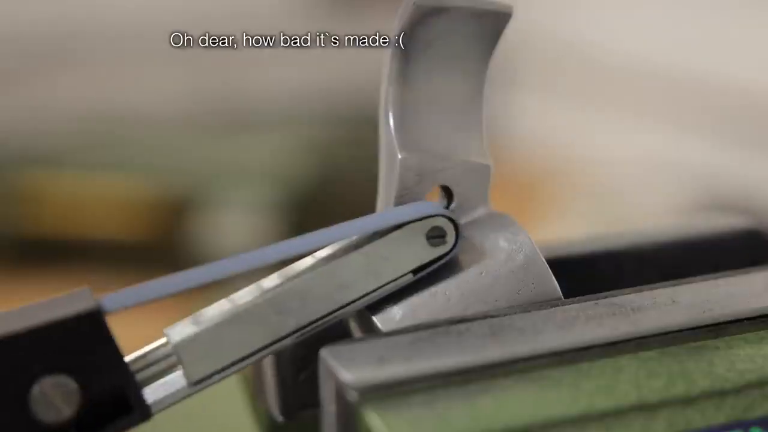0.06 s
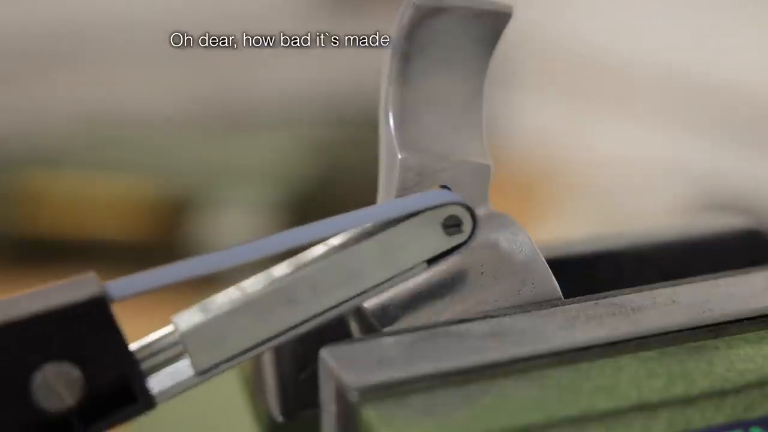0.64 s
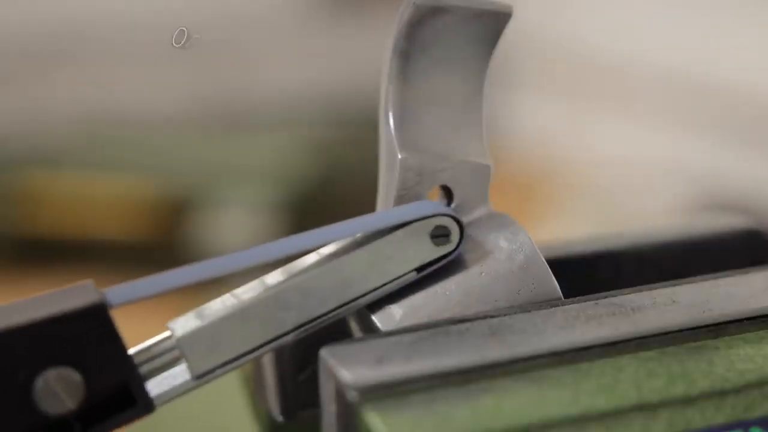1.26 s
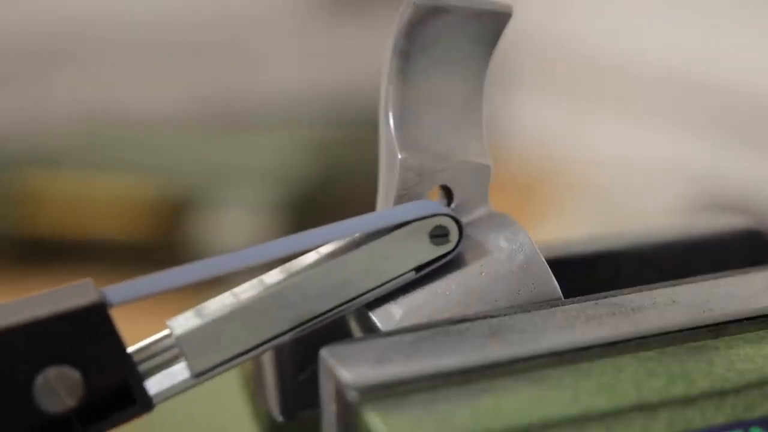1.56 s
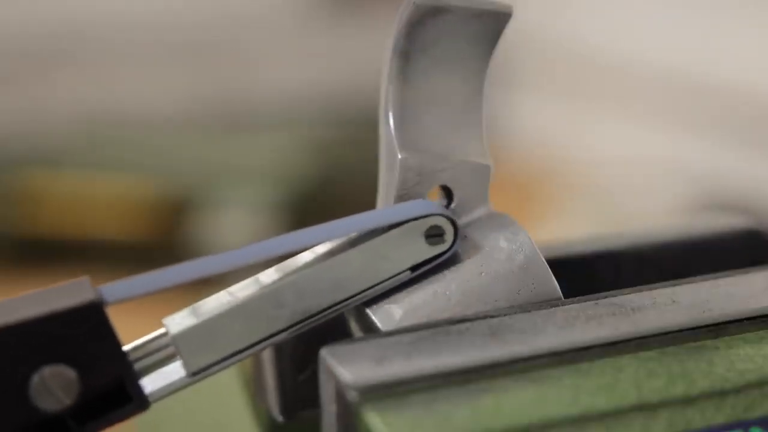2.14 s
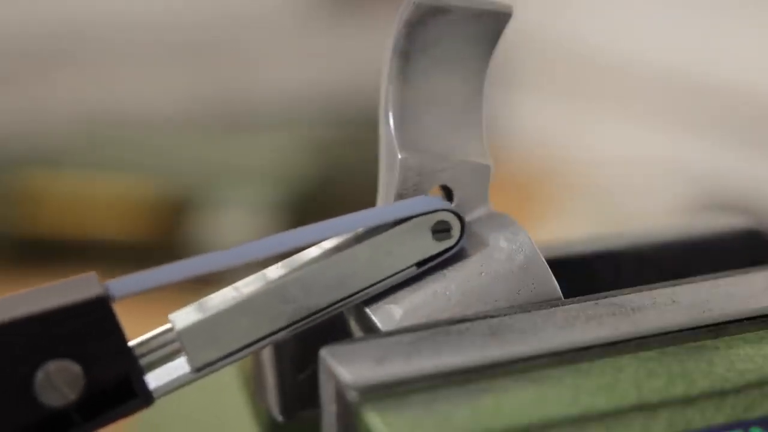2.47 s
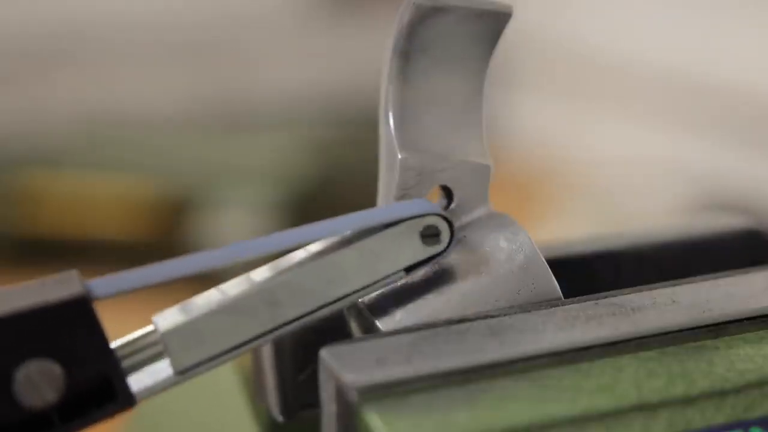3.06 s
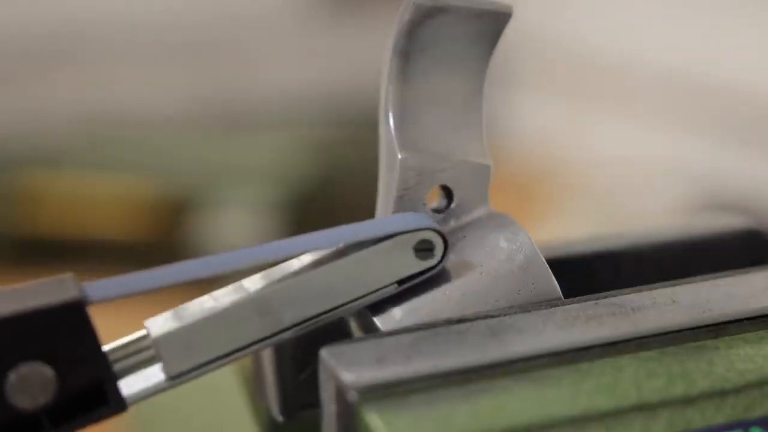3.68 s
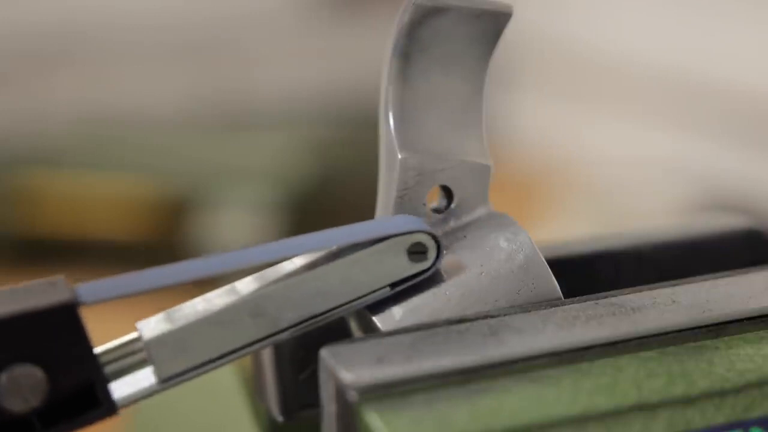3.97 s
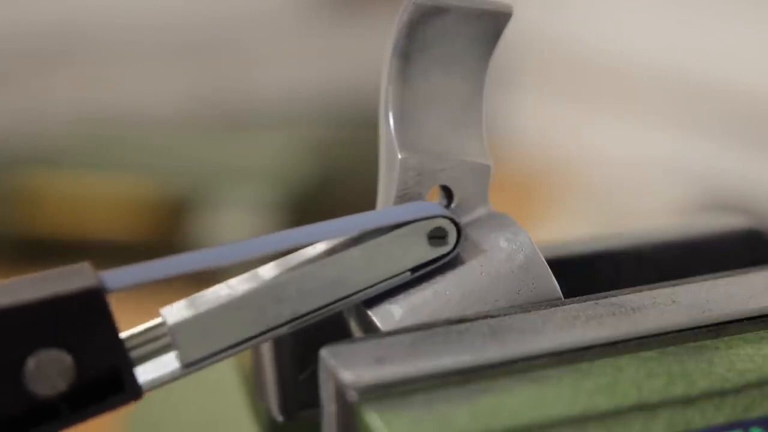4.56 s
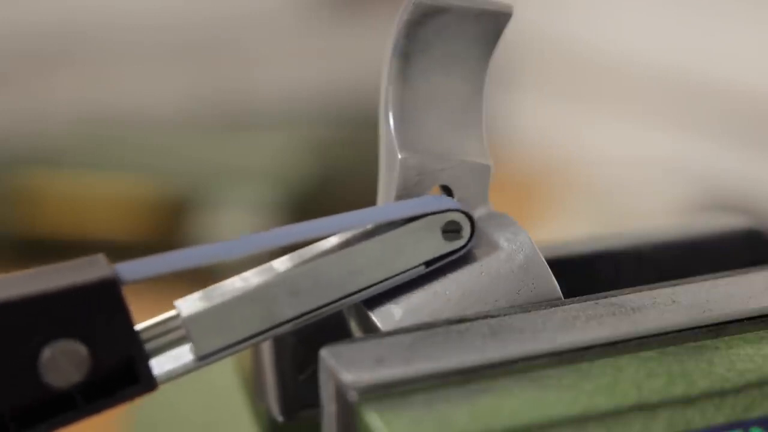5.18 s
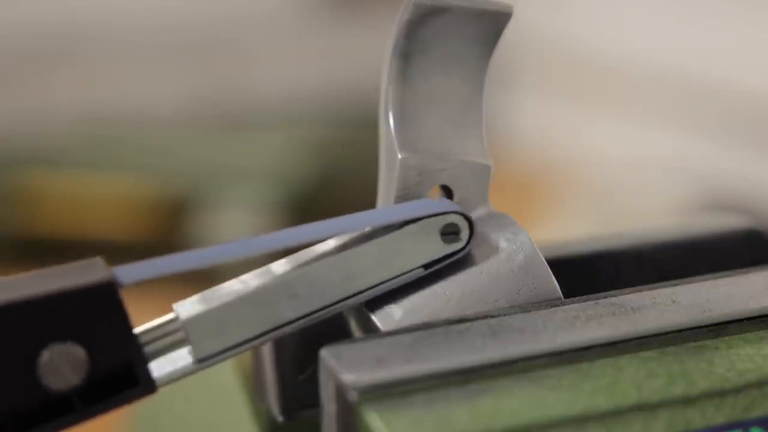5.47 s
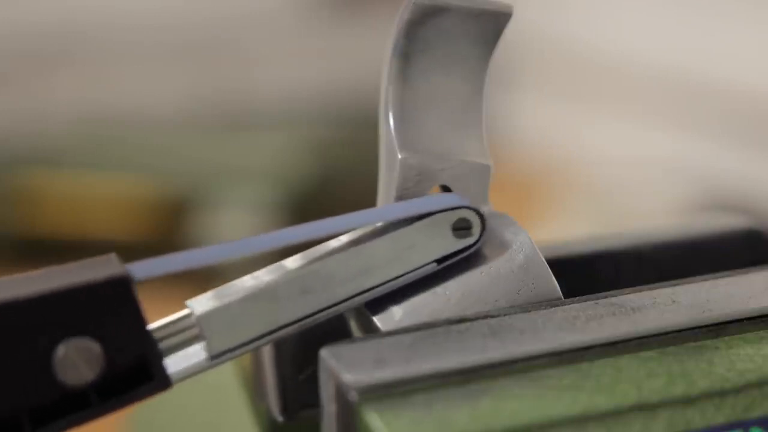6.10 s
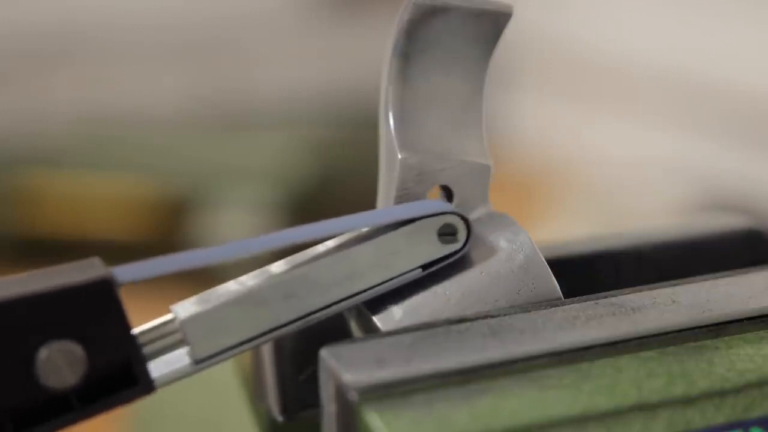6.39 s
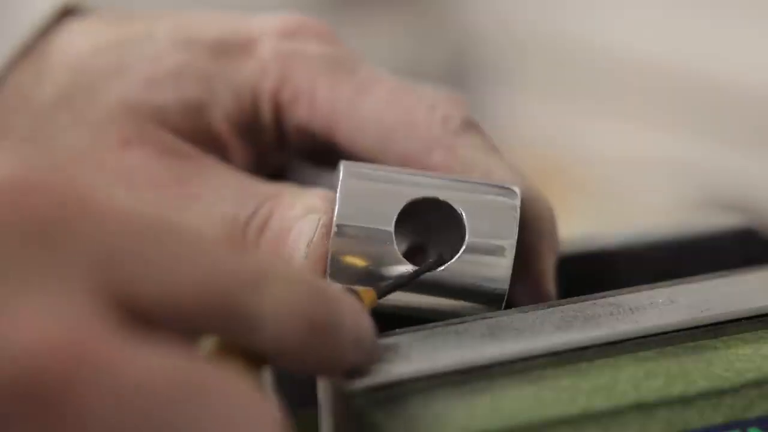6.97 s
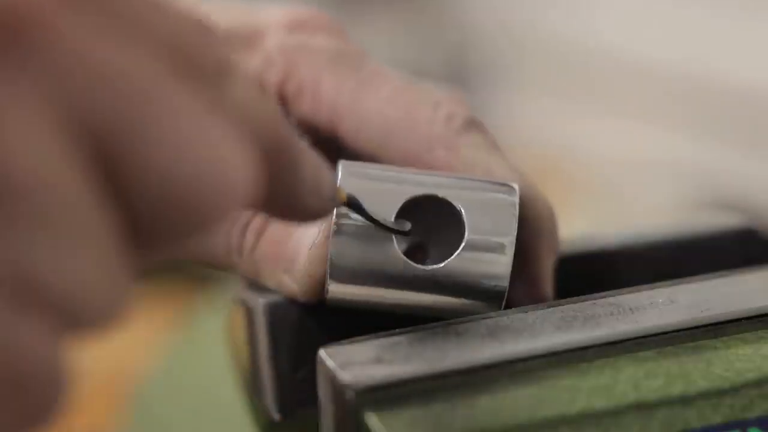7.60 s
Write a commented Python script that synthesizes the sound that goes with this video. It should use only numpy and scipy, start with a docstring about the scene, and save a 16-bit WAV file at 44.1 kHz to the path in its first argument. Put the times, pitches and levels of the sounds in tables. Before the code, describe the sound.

Close by, a whining, rattling belt sander rasps on a metal part, then cuts off, leaving quiet handling and small scratches.

```python
"""In a small workshop, close by, an electric belt file grinds a cast metal part held in a vice.
Its motor pulls in jerks, one each half-wave of the mains power, so the gear whine and the rattle buzz.
The gritty belt hisses and tears off chips; pressing harder slows it, and at times the tool's arm squeals.
The grinding stops dead. Then, quietly, hands hold the part and a hooked scraper picks at the edge
of its bore (the round hole in it)."""
import sys
import numpy as np
from scipy import signal
from scipy.fft import rfft, irfft
from scipy.io import wavfile

SR = 44100
rng = np.random.default_rng(int(sys.argv[2]) if len(sys.argv) > 2 else 0)


def to_wav(sig):
    """Store sig (one row per channel, or 1-D mono) as 16-bit WAV at the path in sys.argv[1].

    Samples outside -1..1 are clipped; the rate is SR.
    """
    pcm = np.clip(np.atleast_2d(sig), -1, 1) * 32767
    pcm = np.round(pcm).astype(np.int16)
    wavfile.write(sys.argv[1], SR, pcm.T)  # frames by channels


N = 345461
T = np.arange(N) / SR

# The gear's speed, highest when the belt runs free. Each row: time in seconds, teeth per second.
GEAR_SPEED = [(0.0, 1646), (0.24, 1619), (0.4, 1655), (0.55, 1638), (0.66, 1686), (1.15, 1679),
              (1.72, 1624), (1.9, 1634), (2.13, 1603), (2.57, 1594), (2.73, 1687), (3.55, 1683),
              (3.75, 1630), (4.2, 1649), (4.79, 1622), (5.06, 1650), (5.21, 1606), (5.38, 1632),
              (5.49, 1605), (5.65, 1632), (5.8, 1593), (5.96, 1622), (6.14, 1573), (6.33, 1620),
              (6.7, 1618)]
# The belt is laid on the part. Each row: touch and lift times in seconds, then levels in dB of
# the hiss at full load, the fizz of chips and the squeal at its strongest.
PASSES = [(0.0, 0.512, -42.5, -50.5, -41.5), (1.064, 2.56, -41.5, -45.5, -36.5),
          (3.331, 4.5, -47, -49.5, -45.5), (4.654, 5.42, -42.5, -48.5, -35), (5.496, 6.72, -45, -46, -40.5)]
# The grit bites deeper. Each row: start in seconds, length in seconds, fizz level in dB.
BITES = [(0.29, 0.075, -43), (1.06, .06, -44), (1.41, .07, -43.5), (1.72, 0.099, -40.5), (1.99, 0.11, -40),
         (2.33, 0.11, -45), (4.67, .08, -44.5), (4.96, .05, -40.5), (5.11, .05, -44.5), (5.29, 0.13, -42.5),
         (5.56, 0.15, -48), (5.95, .1, -44)]
# The belt snags on an edge with a dull scrape. Each row: start in seconds, length in seconds, level in dB.
SNAGS = [(3.59, .05, -58), (5.08, .14, -57), (6.09, 0.024, -50.5)]
# The belt rollers' tones. Each row: pitch in Hz at 1690 teeth per second, relative level in dB.
ROLLER_TONES = [(50, -12), (75, -9), (95, 0), (188, -15), (247, -9), (263, -6)]
# The handwork. Each row: time in seconds, relative levels in dB of hand rumble and of scraper rubbing.
HANDWORK = [(6.74, -91, -99), (6.876, -69, -85), (7.146, -73.5, -99), (7.212, -81, -98),
            (7.346, -78.5, -99), (7.722, -62, -82), (7.83, -71, -74)]
# The scraper catches. Each row: time in seconds, relative level in dB, offset for its knock in dB.
CATCHES = [(7.492, -67, -2), (7.553, -66, -3), (7.583, -68, -2), (7.624, -56, -15), (7.632, -59, -10),
           (7.666, -58, -2), (7.707, -59, -10), (7.754, -62, -8), (7.79, -47.5, -23), (7.804, -61, -4),
           (7.814, -57, 2)]
# The scraper rings on the part. Each row: pitch in Hz, relative level in dB, seconds to fade by 60 dB.
SCRAPER_TONES = [(650, -3, .006), (1590, -5, 0.0096), (2620, -11, .013), (2770, -9, .013),
                 (3190, -2, 0.013), (3330, -8, 0.013), (3500, -18.5, 0.014), (5000, -22, .008),
                 (6350, -18, .01), (8430, -13, .007)]

# How low or bright each noise is. Each row: frequency in Hz, relative level in dB.
CHATTER_COLOUR = [(200, -30), (480, -21.5), (630, -7.5), (1100, -7.5), (1350, -3.5), (1950, -2.5),
                  (2800, 0), (3900, 3.5), (4350, -4.5), (6300, -5.5), (9000, -18.5), (14000, -35)]
REBOUND_COLOUR = [(2000, -25.5), (3000, -0.5), (3750, 3.0), (4600, -27.5), (8000, -27.5)]
SPARK_COLOUR = [(6000, -22), (9800, 0), (11500, 0), (13000, -13), (16000, -23)]
HISS_COLOUR = [(2000, -21.5), (5000, -15.5), (7000, 1), (9000, -2), (11300, -9), (12500, -16),
               (16000, -28.5)]
FIZZ_COLOUR = [(3000, -18), (7000, 1.5), (10500, 5.5), (12500, -1.5), (14000, 0), (16000, -8.5)]
RUB_COLOUR = [(30, -13), (130, 0), (240, 2), (450, 5.5), (800, -3), (1200, 7), (2200, -17)]
HANDS_COLOUR = [(20, -22), (40, -2), (90, 1.5), (140, -27), (300, -24), (600, -25), (1500, -55)]
ROOM_COLOUR = [(59, -33), (100, -2), (467, -13), (576, -14.5), (774, -20), (1090, -19.5), (1310, -22.5),
               (13900, -29.5), (15500, -33)]

# Where the tool's housing, its metal arm, the part and the bench like to ring.
# Each row: frequency in Hz, width in Hz, boost in dB.
HOUSING_RINGS = [(1574, 220, 5), (3764, 220, 5), (5170, 260, 9.5), (5557, 310, 5)]
ARM_RINGS = [(1259, 24, 6), (1496, 20, 6), (2994, 20, 7), (3201, 30, 6), (3436, 20, 6), (3665, 30, 4),
             (3737, 28, 3), (5597, 30, 5), (6200, 40, 4)]
PART_RINGS = [(7720, 110, 6), (9033, 45, 7), (9217, 45, 8), (13900, 250, 4)]
BENCH_RINGS = [(48.1, 14, 4.5), (214, 48, 20.5)]

STOP_S, JERK_HZ, GEAR_TEETH = 6.713, 95.955, 11
FREE_HZ, SAG_HZ = 1686, 85  # load is 0 at the free tooth rate and 1 (full) when SAG_HZ slower
WHINE_DB, WHINE_TOUCH_DB, WHINE_SQUEAL_DB = -39.7, -2.5, 2.8  # level; change on the part; change in a squeal
THIRD_DB, THIRD_TOUCH_DB = -48, -2  # overtone at three times the whine's pitch; change on the part
SQUEAL_HZ, SQUEAL_WIDTH_HZ, SQUEAL_BUILD_S = 3192, 55, .11
# Each pair: a base level, and how much that sound grows from no load to full load.
RATTLE_DB, RATTLE_LOAD_DB = -33.5, 0.93
HISS_DB, HISS_LOAD_DB = -43, 5
RUB_DB, RUB_LOAD_DB = -66.5, 2.5
THRUM_DB, THRUM_LOAD_DB = -71, 8.5


def amp(db):
    """Turns decibels into a number to multiply by."""
    return 10 ** (np.asarray(db) / 20)


def unit(x):
    """Scales a signal to an average strength (rms) of 1."""
    return x / np.sqrt(np.mean(x ** 2) + 1e-20)


def curve(rows, column=1):
    """Joins one column of a table with straight lines in time."""
    rows = np.array(rows)
    return np.interp(T, rows[:, 0], rows[:, column])


def wander(hz):
    """A smooth random drift, mostly slower than hz."""
    freqs = np.fft.rfftfreq(8192, T[-1] / 8192)
    slow = irfft(rfft(rng.standard_normal(8192)) / (1 + (freqs / hz) ** 4))
    return unit(np.interp(T, np.linspace(0, T[-1], len(slow)), slow))


def colour(x, points, rings=()):
    """Shapes a sound with a colour table and any ringing boosts; the result has strength 1."""
    freqs = abs(np.fft.fftfreq(8192, 1 / SR))
    hz, db = np.transpose(points)
    boost_db = sum(boost / (1 + (2 * (freqs - centre) / width) ** 2) for centre, width, boost in rings)
    gain = amp(np.interp(np.log(freqs + 1), np.log(hz), db) + boost_db)
    response = np.exp(np.conj(signal.hilbert(np.log(gain))))  # rings after a click, never before
    ring = np.fft.ifft(response).real[:4096]
    return unit(signal.oaconvolve(x, ring)[:N])


def grains(per_s, spread_db):
    """Random clicks; a wider spread makes a few much louder than the rest."""
    size = amp(spread_db * np.minimum(rng.exponential(1, N), 4))
    return unit(size * rng.choice([-1, 1], N) * (rng.random(N) < per_s / SR))


def held(start, end, rise=.02, fall=.14):
    """Fades in from start, holds at 1 until end, then fades out; all in seconds."""
    end = max(end, start + rise)
    return np.interp(T, [start, start + rise, end, end + fall], [0, 1, 1, 0])


def bursts(rows):
    """A short swell in loudness for each row."""
    return sum(amp(db) * held(start, start + length, rise=.025, fall=.05) for start, length, db in rows)


def jerk(centre, width):
    """A smooth bump at every motor jerk; centre and width are fractions of one cycle."""
    offset = (T * JERK_HZ - centre + .5) % 1 - .5
    return np.exp(-.5 * (offset / width) ** 2)


def kick(start, decay):
    """A quick rise and slower fall at every motor jerk; start and decay are fractions of one cycle."""
    age = (T * JERK_HZ - start) % 1 / decay
    return age * np.exp(1 - age)


def taps(centre, jitter, spread_db):
    """One click per motor jerk, never quite alike; centre and jitter are fractions of one cycle."""
    count = int(T[-1] * JERK_HZ) - 1
    late, size = rng.standard_normal((count, 2)).T
    at = np.round((np.arange(count) + centre + jitter * late) / JERK_HZ * SR).astype(int)
    return unit(np.bincount(np.clip(at, 0, N - 1), amp(spread_db * size), N))


def arm_ringing(speed):
    """How strongly the arm rings, 0 to 1: it builds while twice the whine's pitch is near the arm's own."""
    near = 1 / (1 + (2 * (2 * speed - SQUEAL_HZ) / SQUEAL_WIDTH_HZ) ** 2)
    memory = np.exp(-1 / (SQUEAL_BUILD_S * SR))
    built_up = signal.lfilter([1 - memory], [1, -memory], near)
    return np.sqrt(near * built_up)


def gear_whine(teeth, contact, ringing):
    """Each jerk presses the teeth harder and twists the gear ahead; the gear wobbles once a turn."""
    pull = 1 + 2.4 * jerk(centre=.53, width=.1) + .55 * jerk(centre=.98, width=.1)
    twist = .9 * jerk(centre=.85, width=.1)
    phase = 2 * np.pi * teeth
    shaft = phase / GEAR_TEETH
    force = pull * (1 - .25 * np.cos(shaft)) * amp((.5 + 1.5 * contact) * wander(hz=9))
    sway = twist + .22 * np.sin(shaft) + .1 * wander(hz=40)
    whine_db = WHINE_DB + WHINE_TOUCH_DB * contact + WHINE_SQUEAL_DB * ringing
    whine = amp(whine_db) * unit(force * np.cos(phase + sway))
    # The arm rings on between jerks, so its squeal, an octave up, is steadier.
    grip = sum(amp(db) * held(touch, lift) for touch, lift, _, _, db in PASSES)
    squeal = grip * ringing * unit(np.sqrt(force) * np.cos(2 * phase + .5 * sway))
    third = amp(THIRD_DB + THIRD_TOUCH_DB * contact) * unit(force * np.cos(3 * phase + sway))
    return whine + squeal + third


def drive_rattle(teeth, load):
    """Each jerk knocks the loose drive to and fro; chatter and fan air ring the housing in between."""
    wobble = 1 + .15 * np.cos(2 * np.pi * teeth / GEAR_TEETH)
    clicks = grains(per_s=18000, spread_db=3) * (1 + .31 * kick(start=.42, decay=.032)) * wobble
    knocks = taps(centre=.625, jitter=.014, spread_db=2.1)
    chatter = colour(clicks, CHATTER_COLOUR, HOUSING_RINGS + ARM_RINGS)
    rebound = colour(knocks, REBOUND_COLOUR, HOUSING_RINGS + ARM_RINGS)
    level_db = RATTLE_DB + RATTLE_LOAD_DB * load + .5 * wander(hz=22)
    return amp(level_db) * unit(chatter + amp(-6) * rebound)


def sparks():
    """The motor's brushes spit a short, bright crackle each time the current peaks."""
    spit = grains(per_s=20000, spread_db=2) * jerk(centre=.49, width=.04) * amp(2 * wander(hz=45))
    return amp(-50) * colour(spit, SPARK_COLOUR)


def belt(load):
    """The belt hisses along the arm; its grit tears off chips in uneven bites, over dull rubbing."""
    pull = amp(wander(hz=52)) * (1 + .5 * kick(start=.37, decay=.088))
    hiss = colour(grains(per_s=20000, spread_db=5.5) * pull, HISS_COLOUR, PART_RINGS)
    chips = grains(per_s=20000, spread_db=2) * pull * amp(.9 * wander(hz=34.7))
    fizz = colour(chips, FIZZ_COLOUR, PART_RINGS)
    rub = colour(rng.standard_normal(N), RUB_COLOUR, rings=[(231, 22, 2.3), (362, 170, 5.1)])
    scouring, cutting = 0, 0
    for touch, lift, hiss_db, fizz_db, _ in PASSES:
        pressed = held(touch, lift)
        scouring += pressed * amp(hiss_db + HISS_LOAD_DB * (load - 1))
        cutting += pressed * amp(fizz_db)
    cutting *= amp(2.4 * wander(hz=9))
    # hypot adds two levels the way unrelated noises add up.
    return (np.hypot(amp(HISS_DB), scouring) * hiss
            + np.hypot(cutting, bursts(BITES)) * fizz
            + np.hypot(amp(RUB_DB + RUB_LOAD_DB * load), bursts(SNAGS)) * rub)


def rollers(teeth, load, contact, idle_share=.35):
    """Slightly oval rollers drum unevenly, louder while the belt is pressed to the part."""
    clock = teeth / 1690  # runs slow when the gear does
    tones = 0
    for hz, db in ROLLER_TONES:
        level = amp(db + 2.5 * wander(hz=6))
        tones += level * np.cos(2 * np.pi * hz * clock + .6 * wander(hz=9))
    return amp(THRUM_DB + THRUM_LOAD_DB * load) * np.maximum(contact, idle_share) * unit(tones)


def with_echoes(x, echo_db, fade_s):
    """The bench and walls add a short tail of echoes that falls 60 dB in fade_s."""
    t = np.arange(SR // 2) / SR
    echoes = rng.standard_normal(len(t)) * (rng.random(len(t)) < 2500 / SR)
    tail = echoes * (t > .003) * amp(-60 * t / fade_s)
    return x + amp(echo_db) * signal.oaconvolve(x, tail / np.linalg.norm(tail))[:N]


def hands():
    """Fingers shift on the part with a low rumble that rings the bench."""
    return amp(curve(HANDWORK) + 6) * colour(rng.standard_normal(N), HANDS_COLOUR, BENCH_RINGS)


def still_room():
    """The faint, steady hush of the workshop."""
    return amp(-73.5) * colour(rng.standard_normal(N), ROOM_COLOUR)


def scraper():
    """The hook drags over the bore's edge and catches: a scratch and a dull knock each time."""
    t = np.arange(4000) / SR
    ring = sum(amp(db - 60 * t / fade_s) * np.sin(2 * np.pi * hz * t) for hz, db, fade_s in SCRAPER_TONES)
    catches, knocks = np.zeros((2, N))
    for start, db, knock_db in CATCHES:
        at = min(round(start * SR), N - 1)
        catches[at], knocks[at] = amp(db), amp(db + knock_db)
    part_thud = np.sin(2 * np.pi * 780 * t) * np.exp(-t / .0012)
    bench_thud = .25 * np.sin(2 * np.pi * 205 * t) * np.exp(-t / .018)
    thuds = signal.oaconvolve(knocks, part_thud + bench_thud)[:N]
    # Each catch lets go in a burst of tiny slips, then the hook skids on for a moment.
    release = (1 - np.exp(-t / .001)) * (np.exp(-t / .003) + .3 * np.exp(-t / .016))
    slips = unit(signal.oaconvolve(grains(per_s=8100, spread_db=0), ring)[:N])
    rubbing = amp(curve(HANDWORK, column=2) - 7)
    scratching = amp(-5) * signal.oaconvolve(catches, release)[:N]
    return slips * (rubbing + scratching) + amp(9.5) * thuds


def scene():
    """The tool grinds until it stops dead; the quiet handwork follows."""
    speed = curve(GEAR_SPEED)
    load = np.clip((FREE_HZ - speed) / SAG_HZ, 0, None)
    contact = np.minimum(sum(held(touch, lift) for touch, lift, *_ in PASSES), 1)  # 1 on the part
    teeth = np.cumsum(speed + (1 + 2 * contact) * wander(hz=10)) / SR  # gear teeth passed so far
    rasp = with_echoes(drive_rattle(teeth, load) + sparks() + belt(load), echo_db=-7.5, fade_s=.29)
    tool = gear_whine(teeth, contact, arm_ringing(speed)) + rasp + rollers(teeth, load, contact)
    handwork = hands() + still_room() + with_echoes(scraper(), echo_db=-6, fade_s=.25)
    running = np.clip((STOP_S - T) / .002, 0, 1)
    return (running * tool + (1 - running) * handwork)[None]


def record(dry):
    """Cuts away the very highest treble, above 15700 Hz."""
    low_pass = signal.firwin(511, 15700, window=("kaiser", 9), fs=SR)
    return signal.oaconvolve(dry, low_pass[None], "same")


dry = scene()
out = record(dry)
to_wav(out)
```